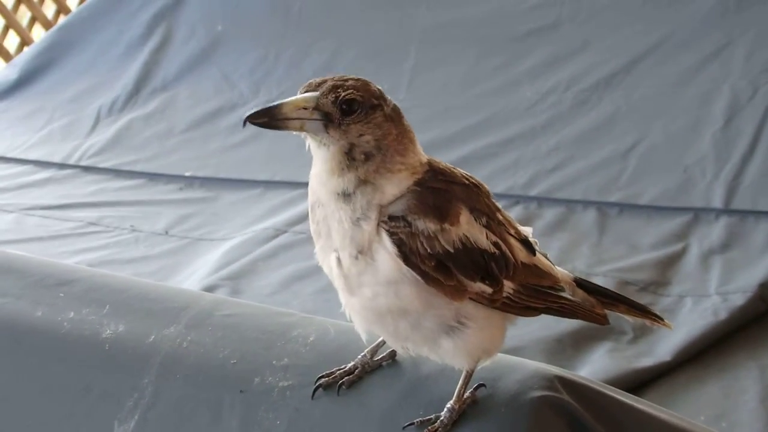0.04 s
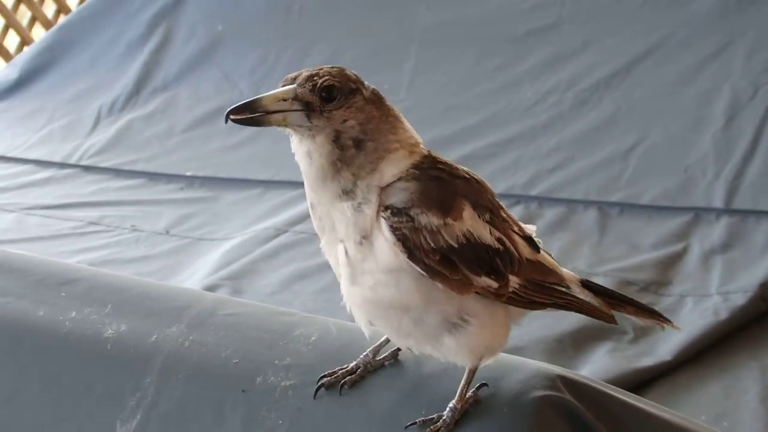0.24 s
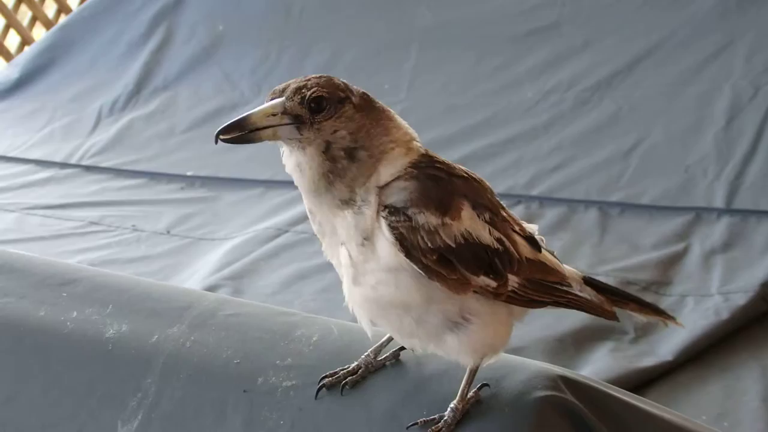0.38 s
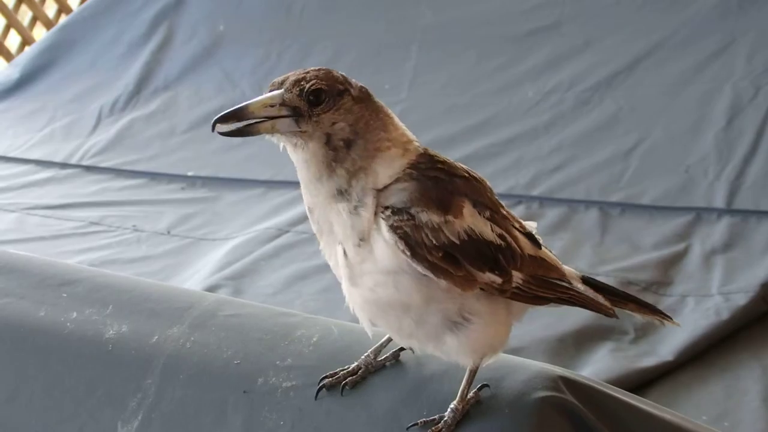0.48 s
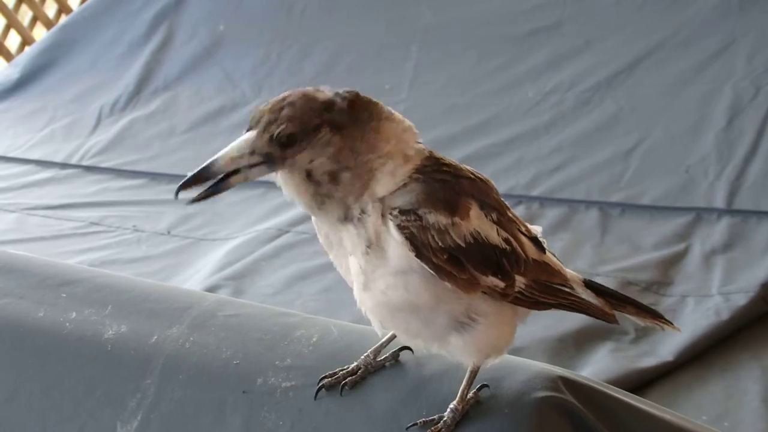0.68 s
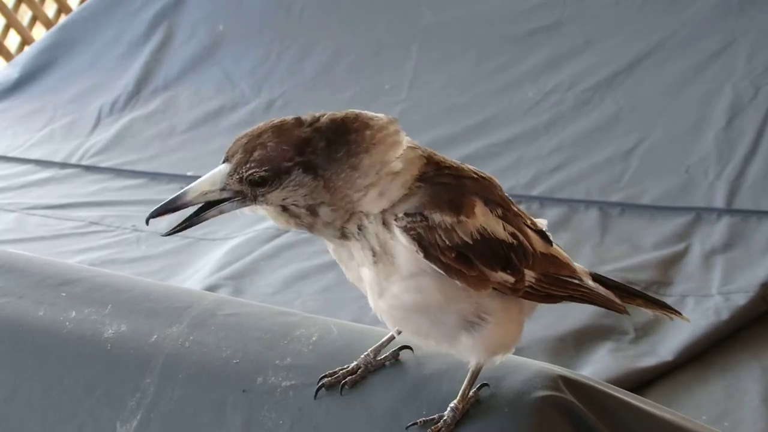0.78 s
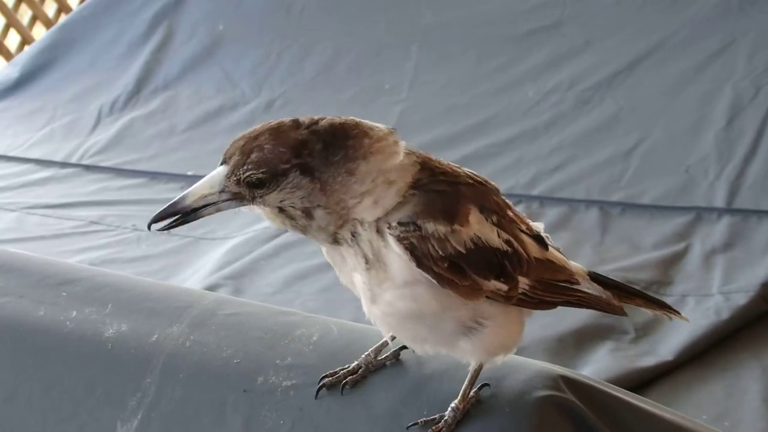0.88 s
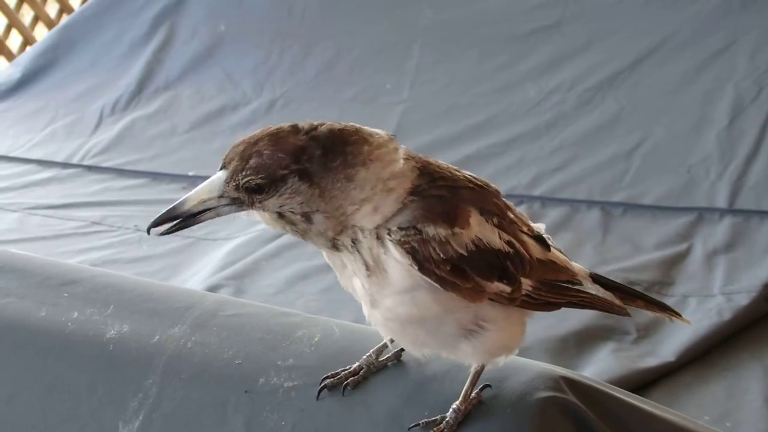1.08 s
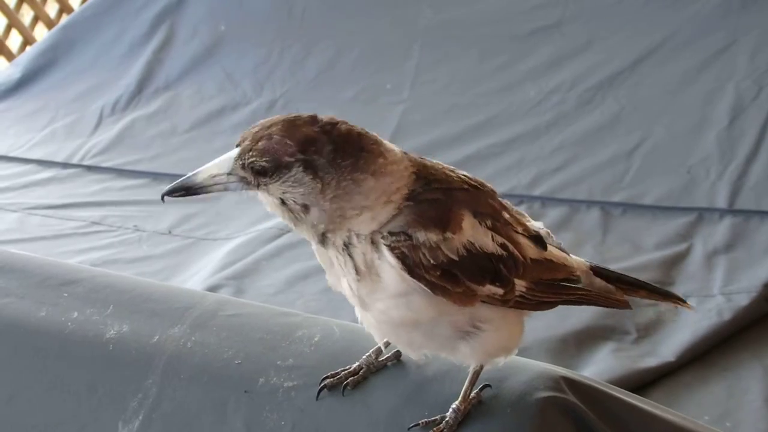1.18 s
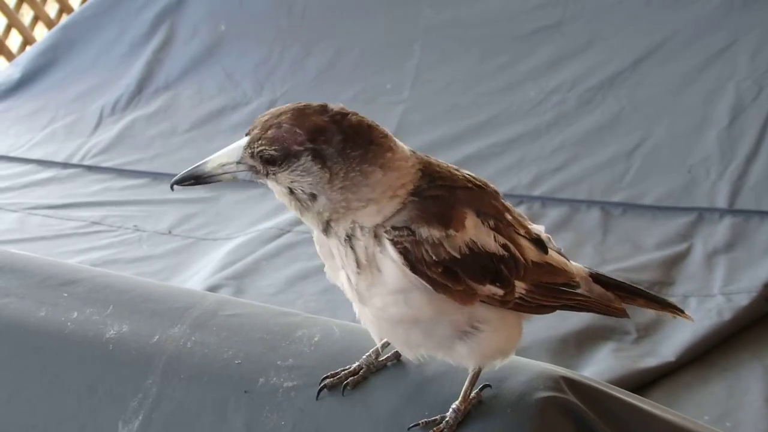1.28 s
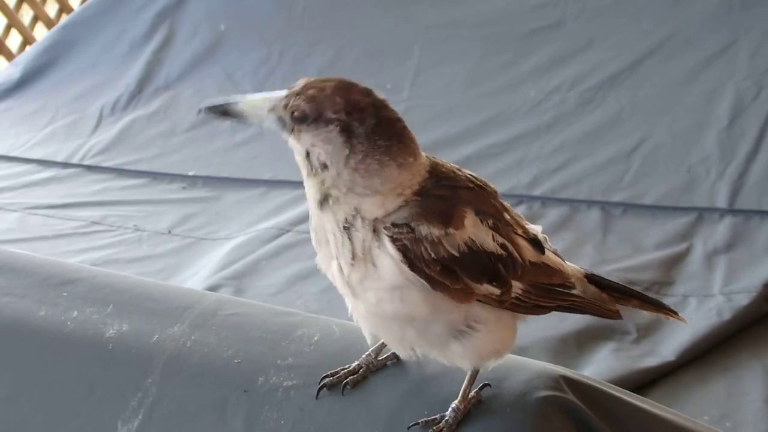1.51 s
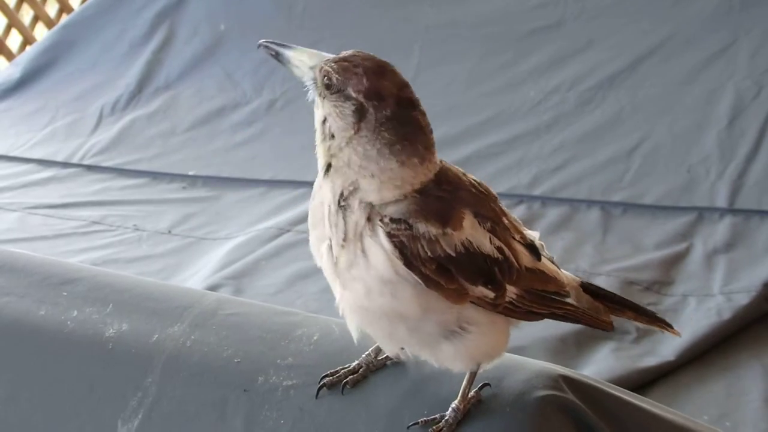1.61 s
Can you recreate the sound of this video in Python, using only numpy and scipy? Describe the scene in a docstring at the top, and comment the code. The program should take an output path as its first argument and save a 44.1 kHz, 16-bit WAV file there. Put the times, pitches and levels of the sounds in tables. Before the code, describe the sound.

Steady distant outdoor wash opens alone. A close songbird sings two tiny, fast-falling chirps at 0.22 and 0.39 seconds, a slightly raspy throbbing trill from 0.62 to 0.73, then two nearly pure, steady flute notes around 1.25 kHz, 0.73-0.93 and 0.97-1.14, the second louder. Faint wall echoes and a short dull ring follow. The wash dips under the loud song, then creeps back until the end.

```python
"""A steady wash of distant outdoor noise is heard first, made of random short-time spectra.
A songbird close to the camera's microphone then sings two falling chirps, a throbbing trill and two
long flute notes: almost a sine, with faint high overtones that wander and rasp.
Nearby walls answer with single echoes and a brief dull ring.
The wash sinks as the camera turns its gain down on the loud song, and creeps back."""
import sys
import numpy as np
from scipy import signal
from scipy.io import wavfile
from scipy.ndimage import uniform_filter1d

SR = 44100
rng = np.random.default_rng(int(sys.argv[2]) if len(sys.argv) > 2 else 0)


def wav_out(sig):
    """Save sig, one row per channel (or a flat mono array), as 16-bit PCM at SR to the path in sys.argv[1]."""
    wavfile.write(sys.argv[1], SR, np.round(np.clip(np.atleast_2d(sig).T, -1, 1) * 32767).astype(np.int16))


N = 72765  # length in samples


def bird():
    """The close singer: chirps, trill and flute notes from one throat, on one stereo track."""
    track = np.zeros((2, N))
    chirps(track)
    trill(track)
    flute_notes(track)
    return track


# The falling pitch of each chirp, one list per chirp. Each row: time in seconds, pitch in Hz,
# level in dB, overtone level in dB.
CHIRP_CURVES = [
    [(.2165, 1400, -45, -57), (.2195, 1280, -17, -64), (.2245, 1187, -22.5, -65), (.2275, 1101, -17, -64),
     (.231, 1072, -33.5, -45), (.2335, 1055, -13.5, -47), (.237, 917, -15.5, -44), (.245, 829, -9.5, -46.5),
     (.251, 760, -22.5, -46), (.258, 690, -18, -48), (.264, 640, -32, -65)],
    [(.3925, 1280, -39, -85), (.395, 1210, -26.5, -57.5), (.403, 1039, -22.5, -67), (.411, 884, -13, -54),
     (.416, 818, -16, -55), (.421, 767, -26, -55), (.428, 705, -17.5, -71)],
]
# Throat resonances that colour the chirps' overtones. Each row: centre in Hz, width in Hz, strength in dB.
THROAT_RESONANCES = [(2100, 270, 10), (9800, 640, -0.5), (12500, 740, -4)]
CHIRP_RASP = .4  # share of rasp in the overtones


def chirps(track):
    """Fast falling glides whose overtones are coloured by fixed throat resonances."""
    for rows in CHIRP_CURVES:
        start_s, hz, level, overtone_level = unroll(rows, size=66)
        colour = []
        for multiple in range(2, 18):
            power = sum(gain_of(2 * db) / (1 + (2 * (multiple * hz - centre) / width) ** 4)
                        for centre, width, db in THROAT_RESONANCES)
            colour.append((multiple, 10 * np.log10(power)))
        add(track, start_s, sing(hz, level, overtone_level, colour, [], CHIRP_RASP))


# The throbs of the trill. Each row: peak time in seconds, length in seconds, pitch in Hz,
# pitch fall over the throb in Hz, level in dB, overtone level in dB.
THROB_ROWS = [(0.6265, .015, 1235, 164, -18.5, -56), (0.638, 0.012, 1345, 40, -25.5, -59),
              (0.6456, 0.011, 1212, 120, -14.5, -48), (0.653, 0.009, 1324, 25, -16.5, -57),
              (0.659, 0.0096, 1250, 36, -9, -47), (0.666, 0.014, 1203, 21, -14.5, -39),
              (.678, .013, 1229, 17, -9.5, -33), (.687, 0.011, 1223, 20, -13.5, -39.5),
              (.698, .015, 1223, 15, -16, -36.5), (0.709, 0.013, 1217, 12, -33.5, -45),
              (0.728, .014, 1212, 29.9, -34, -58)]
# Overtones of trill and flute notes. Each row: multiple of the pitch, then strength in dB relative to
# the overtone level: in the trill, first note early, first note late, second note early, second note late.
HIGH_OVERTONES = [(5, -10, 3.5, 0.5, -2.5, -0.5), (6, -8, -4, -0.5, -3.5, -5.5),
                  (7, 1, -17.5, -24.5, -16.5, -23.5), (8, -10, -19.5, -9, -10, -0.5),
                  (9, -12, -11.5, -13.5, -13, -19.5), (10, -3.5, -5.5, -9.5, -3, -11),
                  (11, -16.5, -26.5, -28, -25, -32)]
# The lowest overtones, columns as above, but strength in dB relative to the squared level.
SQUARED_OVERTONES = [(2, -26, -25, -30.5, -28.5, -33.5), (3, -30.5, -29, -26, -39, -28.5),
                     (4, -39.5, -29.5, -36, -43, -38.5)]
THROB_RISE_SHARE = .42  # share of a throb spent rising
THROB_OVERTONE_POWER = 1.6  # above 1, overtones flare more sharply than the pitch tone
TRILL_RASP = .3


def trill(track):
    """Overlapping cosine bumps of loudness; the pitch slides between throbs by their bump heights."""
    first, last = THROB_ROWS[0], THROB_ROWS[-1]
    t = np.arange(first[0] - first[1], last[0] + last[1], 1 / SR)
    u = np.array([(t - peak_s) / length_s for peak_s, length_s, *_ in THROB_ROWS])
    u = u / np.where(u < 0, 2 * THROB_RISE_SHARE, 2 - 2 * THROB_RISE_SHARE)
    u = np.clip(u, -.5, .5)  # -.5 at a throb's start, 0 at its peak, .5 at its end
    bump = np.cos(np.pi * u) + 1e-6
    _, _, hz, fall_hz, db, overtone_db = np.transpose(THROB_ROWS)[:, :, None]
    pitch = (bump * (hz - fall_hz * u)).sum(0) / bump.sum(0)
    level = (bump * gain_of(db)).sum(0)
    overtone_level = (bump ** THROB_OVERTONE_POWER * gain_of(overtone_db)).sum(0)
    colour = [row[:2] for row in HIGH_OVERTONES]
    low_colour = [row[:2] for row in SQUARED_OVERTONES]
    add(track, t[0], sing(pitch, level, overtone_level, colour, low_colour, TRILL_RASP))


# The long notes, one list per note. Each row: time in seconds, pitch in Hz, level in dB,
# overtone level in dB.
NOTE_CURVES = [
    [(.732, 1267, -37, -62), (.742, 1260, -23.5, -63), (.756, 1282, -18.5, -63.5), (.772, 1280, -10.5, -53),
     (.787, 1264, -8.5, -39.5), (.803, 1231, -6, -38.5), (.82, 1232, -12.5, -35.5), (.838, 1245, -6, -34),
     (.853, 1242, -6, -39), (.875, 1238, -7, -37.5), (.895, 1252, -9, -40), (.906, 1263, -6.5, -37.5),
     (.914, 1236, -13, -37.5), (.922, 1293, -24, -42.5), (.93, 1260, -30, -49)],
    [(.97, 1289, -37, -80), (.992, 1272, -25, -56), (1.012, 1283, -10.5, -65.5), (1.03, 1272, -6, -51),
     (1.048, 1261, -3, -34), (1.066, 1275, -3.5, -36.5), (1.085, 1256, -2.5, -43.5),
     (1.102, 1267, -3.5, -31.5), (1.112, 1299, -5.5, -35), (1.121, 1310, -12, -37),
     (1.131, 1330, -19, -33.5), (1.142, 1280, -32, -50.5)],
]
NOTE_RASP = .1


def flute_notes(track):
    """Long, nearly steady tones whose overtone colour shifts once along the way."""
    for note, rows in enumerate(NOTE_CURVES):
        start_s, hz, level, overtone_level = unroll(rows, size=500)
        colour = glide(HIGH_OVERTONES, note, len(hz))
        low_colour = glide(SQUARED_OVERTONES, note, len(hz))
        add(track, start_s, sing(hz, level, overtone_level, colour, low_colour, NOTE_RASP))


def glide(table, note, count):
    """Overtone strengths moving from the early to the late colour around the middle of a note."""
    course = np.linspace(-3, 5, count) if note == 0 else np.linspace(-5, 3, count)
    late = .5 + .5 * np.tanh(course)
    early_column = 2 + 2 * note
    return [(row[0], row[early_column] * (1 - late) + row[early_column + 1] * late) for row in table]


OVERTONE_WANDER_DB, PITCH_JITTER = 3, .0008  # both rms; jitter as a share of the pitch
BIRD_PAN_DB, OVERTONE_PAN_DB = 1.4, -.7  # left minus right
LEFT_LEAD_S = 6.5e-6  # the left channel hears the bird this much earlier


def sing(hz, level, overtone_level, colour, low_colour, rasp):
    """A sine on the pitch plus weak overtones that wander and rasp; colours give dB per multiple."""
    n = len(hz)
    side = np.array([[.5], [-.5]])  # left, right
    cycles = np.cumsum(hz * (1 + PITCH_JITTER * drift(count=n, size=150))) / SR
    phase = 2 * np.pi * (cycles + side * LEFT_LEAD_S * hz)
    highs = 0
    for multiple, db in colour:
        strength = gain_of(db + OVERTONE_WANDER_DB * drift(count=n, size=500))
        roughness = 1 - rasp + rasp * drift(count=n, size=36)
        highs = highs + strength * roughness * np.sin(multiple * phase + 2 * np.pi * rng.random())
    lows = sum(gain_of(db) * np.sin(multiple * phase) for multiple, db in low_colour)
    tone = gain_of(side * BIRD_PAN_DB) * level * (np.sin(phase) + level * lows)
    overtones = gain_of(side * OVERTONE_PAN_DB) * overtone_level * highs
    return np.sqrt(2) * (tone + overtones)  # so levels are rms


def unroll(rows, size):
    """Joins curve rows into smooth per-sample pitch, level and overtone level."""
    s, *columns = np.transpose(rows)
    t = np.arange(s[0], s[-1], 1 / SR)
    edge = np.clip(np.minimum(t - s[0], s[-1] - t) / .002, 0, 1)  # 2 ms fades
    hz, db, overtone_db = (uniform_filter1d(np.interp(t, s, column), size=size, mode="nearest")
                           for column in columns)
    return s[0], hz, edge * gain_of(db), edge * gain_of(overtone_db)


# Single echoes off the nearby walls. Each row: delay in seconds, level in dB before the treble loss.
WALL_ECHOES = [(.01865, -20), (.02817, -21), (.04127, -27.5), (.05079, -29), (.0619, -29), (.0738, -31.5),
               (.0857, -30)]


def echoes(voice):
    """Delayed, weaker copies of the voice."""
    return sum(gain_of(db) * np.roll(voice, round(s * SR), axis=1) for s, db in WALL_ECHOES)


RING_DB, RING_T60_S, RING_START_S = -22.5, .5, .04
RING_LIKENESS = .85  # left-right likeness


def wall_ring(voice):
    """Dense reflections of random sign dying away, partly alike in both channels."""
    t = np.arange(SR // 2) / SR
    signs = rng.choice([-1., 1.], (2, len(t)))
    a, b = signs * (rng.random((2, len(t))) < 2000 / SR)  # about 2000 reflections a second
    right = RING_LIKENESS * a + np.sqrt(1 - RING_LIKENESS ** 2) * b
    tail = np.array([a, right]) * gain_of(-60 * t / RING_T60_S) * (t > RING_START_S)
    tail /= np.linalg.norm(tail[0])
    return gain_of(RING_DB) * signal.fftconvolve(voice.mean(0)[None], tail, axes=1)[:, :N]


DULL_HZ = 5000  # reflections lose treble above this


def dulled(reflections):
    """A one-pole low-pass: the reflections come back with less treble."""
    r = np.exp(-2 * np.pi * DULL_HZ / SR)
    return signal.lfilter([1 - r], [1, -r], reflections)


# Spectrum of the distant wash. Each row: frequency in Hz, relative density in dB per Hz.
WASH_SPECTRUM = [(20, -51), (33, -42), (62, -15), (133, -7.5), (250, -6), (440, -4), (620, -6.5), (860, -3),
                 (1150, -9), (1450, -19), (1700, -22), (2050, -13.5), (3000, -11), (3450, -15), (3850, -4),
                 (4700, -9), (6000, -13.5), (6900, -24.5), (10300, -29), (12500, -35), (14200, -51)]
# How alike the wash is in both channels. Each row: frequency in Hz, left-right likeness (1 = identical).
WASH_LIKENESS = [(60, 1), (230, 0.96), (910, 1), (3530, 0.88), (13700, 0.63)]
# Stereo balance of the wash. Each row: frequency in Hz, left minus right in dB.
WASH_LEAN = [(60, 1.0), (370, 1.5), (2250, 1), (13700, 0.5)]
WASH_DB, PATCH_DB, WAVER_DB = -35.5, 1, 0.31  # rms: whole wash, drifting patches, wavering loudness


def wash():
    """Distant noise: random short-time spectra with drifting patches and a slight random wavering of loudness."""
    hop = 256
    frames, hz = N // hop + 5, np.fft.rfftfreq(1024, 1 / SR)
    a, b, c, d, patches = rng.standard_normal((frames, 513, 5)).T
    patches = uniform_filter1d(patches, size=12, axis=0)  # across frequency
    patches = evened(uniform_filter1d(patches, size=14, axis=1))  # across time
    waver = drift(count=N, size=4000)[np.minimum(np.arange(frames) * hop, N - 1)]
    same = np.clip(read(WASH_LIKENESS, hz), -1, 1)[:, None]
    lean = gain_of(read(WASH_LEAN, hz) / 2)[:, None]
    left = a + 1j * b
    right = same * left + np.sqrt(1 - same ** 2) * (c + 1j * d)
    spectra = np.array([left * lean, right / lean])
    spectra *= gain_of(read(WASH_SPECTRUM, hz)[:, None] + PATCH_DB * patches + WAVER_DB * waver)
    noise = signal.istft(spectra, nperseg=1024, noverlap=1024 - hop)[1][:, :N]
    return gain_of(WASH_DB) * evened(noise)


def gain_of(db):
    """Amplitude factor of a level in dB."""
    return 10 ** (np.asarray(db) / 20)


def evened(x):
    """Scales to an rms of 1."""
    return x / np.sqrt(np.mean(x ** 2) + 1e-20)


def read(points, hz):
    """Reads a frequency curve, straight between its points on a log frequency axis."""
    f, value = np.transpose(points)
    return np.interp(np.log(hz + 1), np.log(f + 1), value)


def add(track, start_s, sound):
    """Lays a sound onto the track."""
    start = round(start_s * SR)
    track[:, start:start + sound.shape[1]] += sound


def drift(count, size):
    """Smooth random wander of rms about 1; size in samples sets its slowness."""
    smooth = uniform_filter1d(uniform_filter1d(rng.standard_normal(N), size), size)
    return smooth[:count] * np.sqrt(1.5 * size)


def scene():
    """The close bird, its reflections off the walls, and the distant wash."""
    voice = bird()
    return voice + dulled(echoes(voice) + wall_ring(voice)) + wash()


AGC_THRESHOLD_DB, AGC_SOFT_DB = -23.5, 3.5  # where loud begins, and how gradually
AGC_FALL_DB_PER_S, AGC_RISE_DB_PER_S = 40.5, 27  # speeds near full gain
AGC_DEPTH_DB = 12  # the cut never exceeds this
EDGE_HZ = 14150  # top of the camera's band


def record(dry):
    """Camera gain turns down, ever more slowly, while loud and creeps back when quiet; band limit."""
    power = uniform_filter1d((dry ** 2).mean(0), size=441)  # over 10 ms
    power_db = 10 * np.log10(abs(power) + 1e-12)
    loud = .5 + .5 * np.tanh((power_db - AGC_THRESHOLD_DB) / AGC_SOFT_DB)
    push = np.cumsum(AGC_FALL_DB_PER_S * loud - AGC_RISE_DB_PER_S * (1 - loud)) / SR
    pressure_db = push - np.minimum.accumulate(push)  # never below zero
    cut_db = AGC_DEPTH_DB * (1 - np.exp(-pressure_db / AGC_DEPTH_DB))
    low_pass = signal.firwin(511, EDGE_HZ, window=("kaiser", 9), fs=SR)
    return signal.oaconvolve(dry / gain_of(cut_db), low_pass[None], "same")


dry = scene()
out = record(dry)
wav_out(out)
```